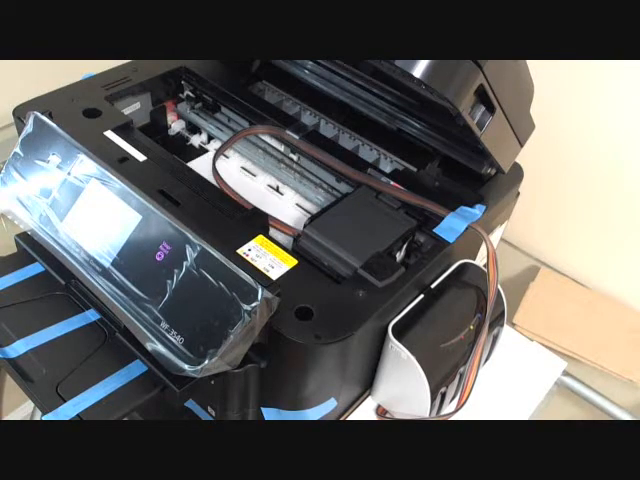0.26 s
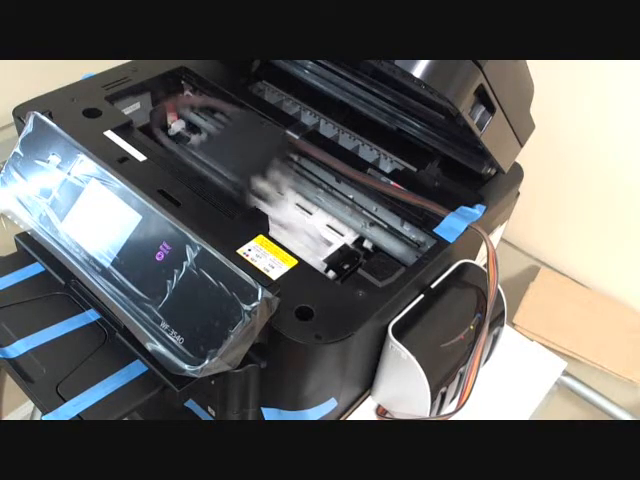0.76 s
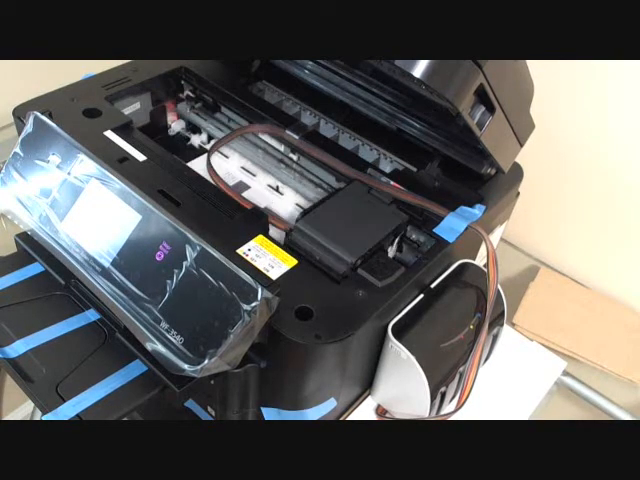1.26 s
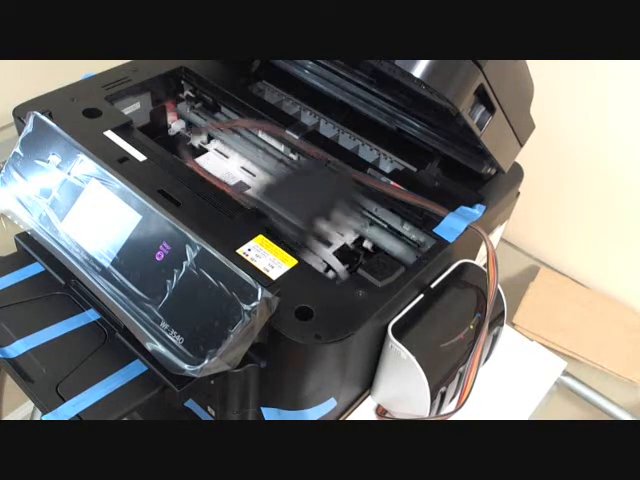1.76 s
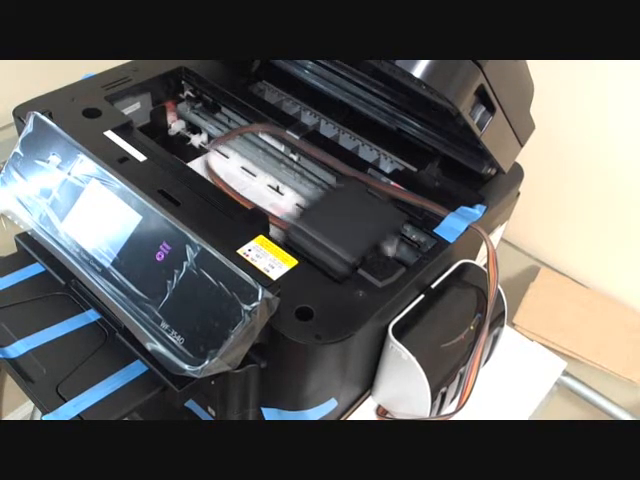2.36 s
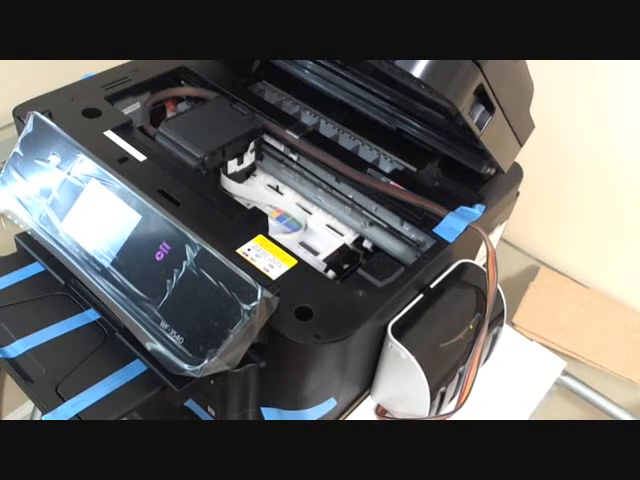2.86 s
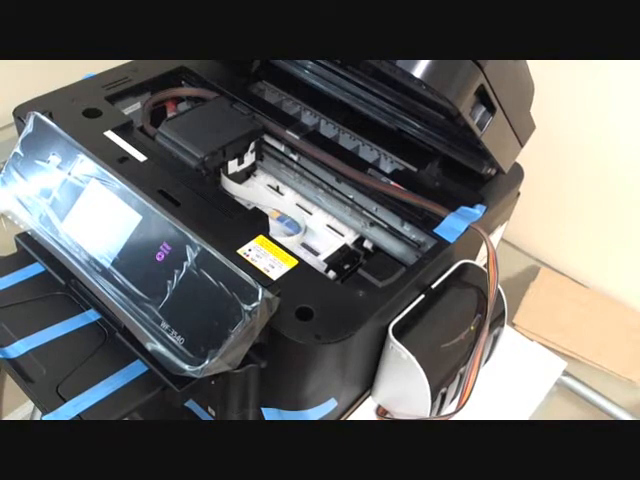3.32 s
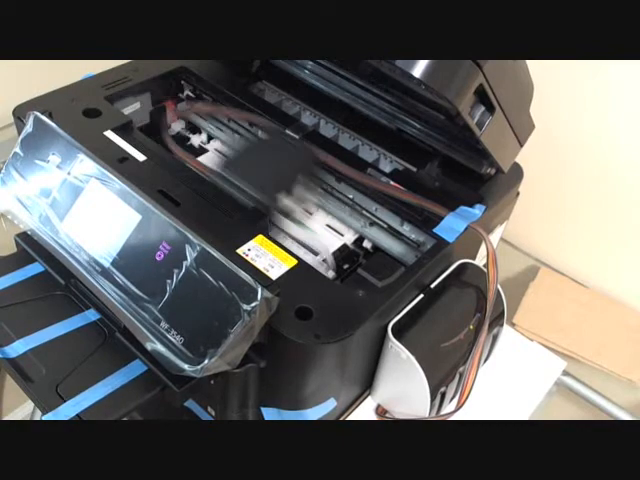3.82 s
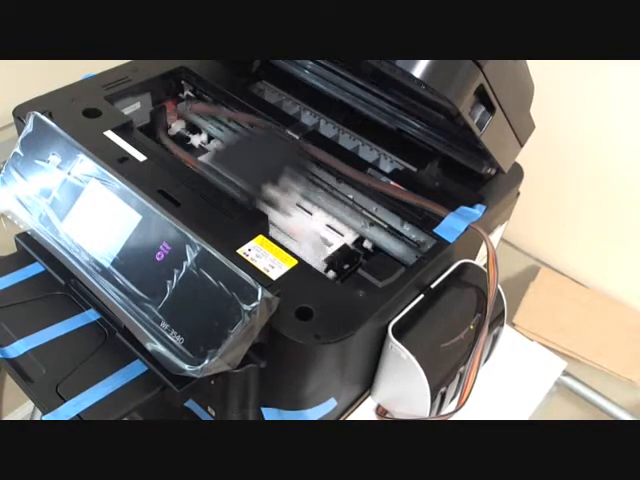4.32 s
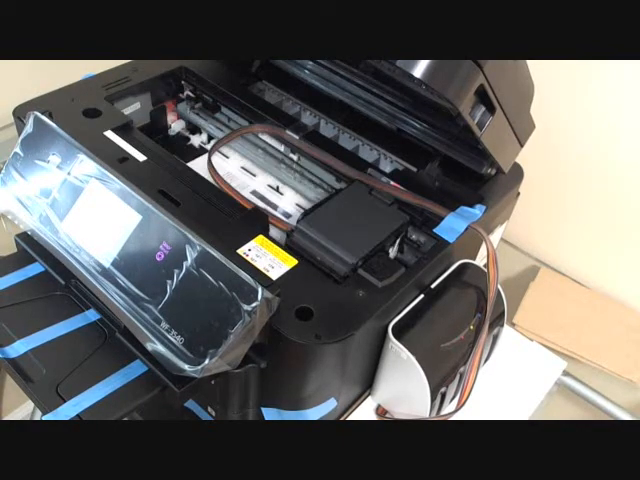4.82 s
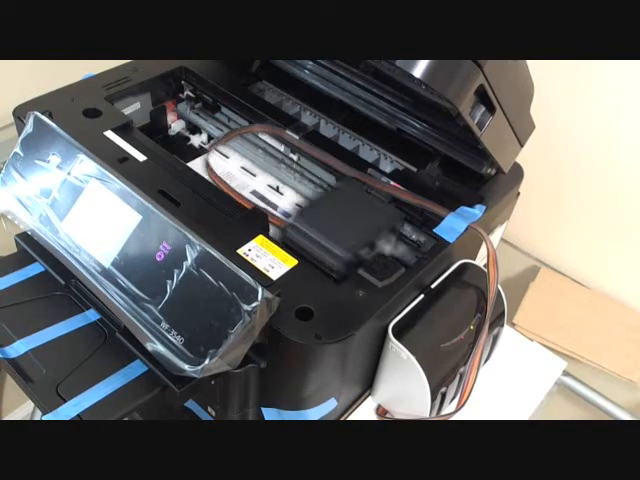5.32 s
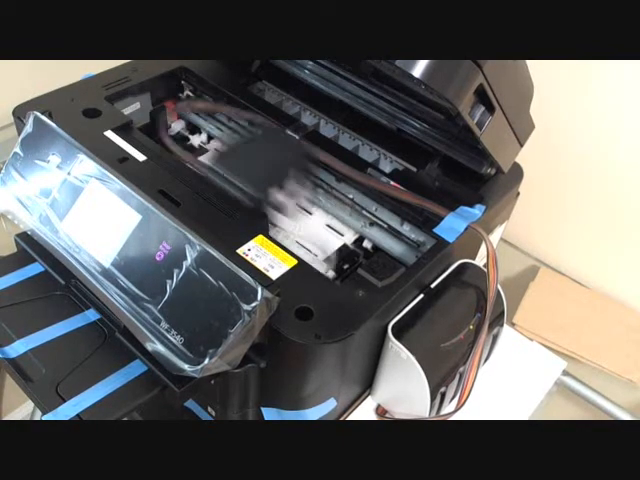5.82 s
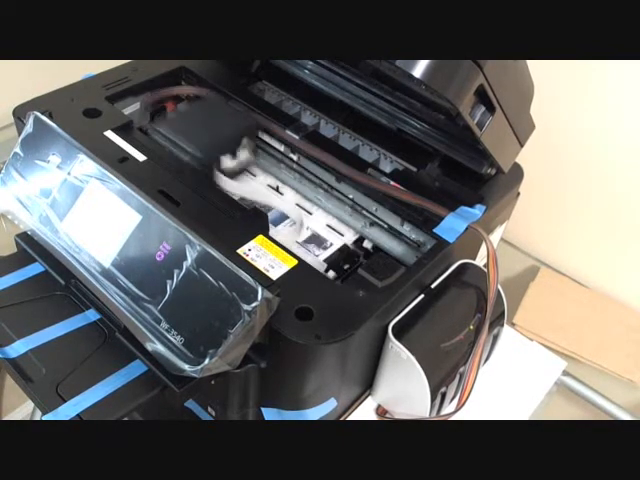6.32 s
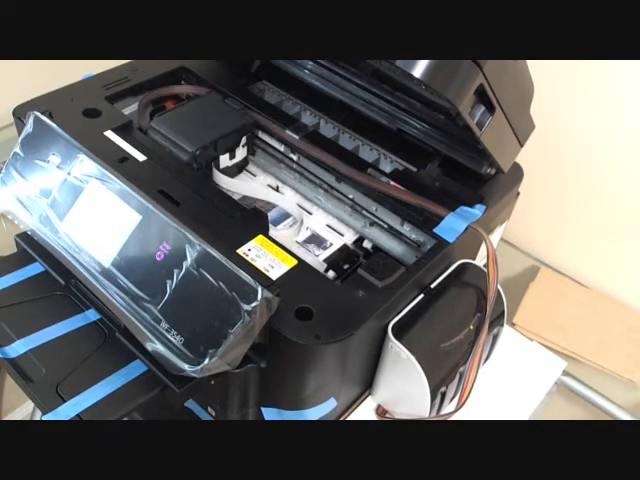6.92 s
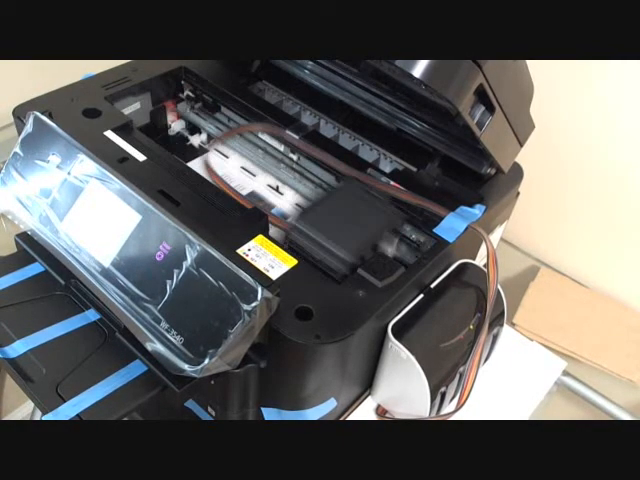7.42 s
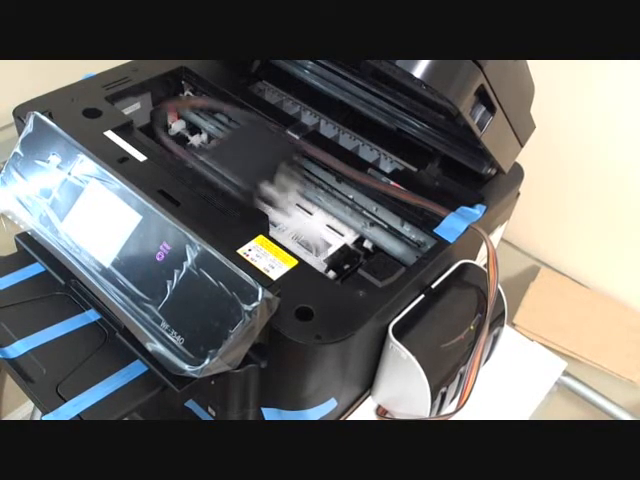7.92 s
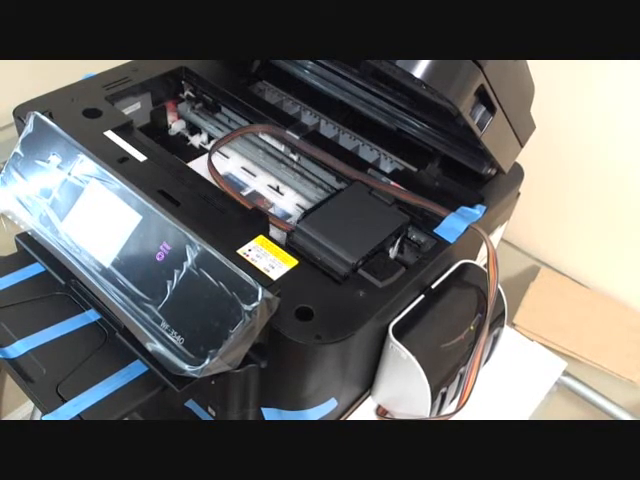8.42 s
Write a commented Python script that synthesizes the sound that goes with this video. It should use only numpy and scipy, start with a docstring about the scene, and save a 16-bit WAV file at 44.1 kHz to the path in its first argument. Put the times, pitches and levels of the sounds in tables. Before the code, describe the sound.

Close to an open inkjet printer in a small quiet room, a hard clack and squeaky gear chatter pull in the sheet. The head makes two faint sweeps, pauses, then shuttles repeatedly with a whining belt drive and sliding rub. Short rattling gear bursts and papery scrapes advance the page between passes, with clacks and soft bumps at the turns. Thin high whistles remain in the pauses.

```python
"""Gears chatter and squeak as an open inkjet printer grabs a sheet, close up in a small room.
The print head then shuttles in short passes: coloured rubbing noise for the rail, sine partials and
fuzzy bands that follow the head speed for the whining belt drive. Between passes grainy noise and case
resonances make the feed gears jerk the paper on. Clacks, jolts and bumps are puffs of coloured noise.
At rest, steady sine whistles of the electronics and a faint hum lie over quiet room air."""
import sys
import numpy as np
from scipy import signal
from scipy.fft import rfft, irfft, next_fast_len
from scipy.io import wavfile
from scipy.ndimage import uniform_filter1d, map_coordinates

SR = 44100
rng = np.random.default_rng(int(sys.argv[2]) if len(sys.argv) > 2 else 0)


def wrap_up_sound(samples):
    """Save the sound to the file named by the first command line argument, as 16-bit audio."""
    columns = np.atleast_2d(samples).T
    # keep every value between -1 and 1, then stretch to whole-number steps
    tamed = np.clip(columns, -1, 1)
    steps = np.round(tamed * 32767).astype(np.int16)
    wavfile.write(sys.argv[1], SR, steps)


N = 382347


def amp(db):
    """Decibels to gain."""
    return 10 ** (np.asarray(db) / 20)


def unit(x):
    """Scale to rms 1."""
    return x / np.sqrt(np.mean(x ** 2) + 1e-20)


def along(points, hz):
    """(Hz, value) points read on a log axis."""
    f, v = np.transpose(points)
    return np.interp(np.log(hz + 1), np.log(f + 1), v)


def clock():
    """The time of every sample, in seconds."""
    return np.arange(N) / SR


def wobble(rate):
    """A smooth random curve, rate knots a second."""
    coarse = np.arange(0, N + 24, 24)
    knots = rng.standard_normal(int(N * rate / SR) + 4)
    curve = map_coordinates(knots, [coarse * rate / SR])
    return np.interp(np.arange(N), coarse, curve)


def narrow(phase, width_hz):
    """A fuzzy line about a running phase."""
    return wobble(2 * width_hz) * np.sin(phase) + wobble(2 * width_hz) * np.cos(phase)


def filtered(x, response):
    """x times a response of frequency."""
    m = next_fast_len(N + SR // 2)
    return irfft(rfft(x, m) * response(np.fft.rfftfreq(m, 1 / SR)), m)[..., :N]


def coloured(x, spectrum):
    """x through a smooth spectrum, at rms 1."""
    return unit(filtered(x, lambda hz: amp(along(spectrum, hz))))


def resonant(x, peaks):
    """x through resonances (f/Hz, width/Hz, level/dB) of alternating sign, at rms 1."""
    def response(hz):
        total = 0
        for k, (centre, width, db) in enumerate(peaks):
            damping = 1j * hz * width
            total = total + (-1) ** k * amp(db) * damping / (centre ** 2 - hz ** 2 + damping)
        return total
    return unit(filtered(x, response))


def grains(rate, spread_db, hiss):
    """Tiny contacts of uneven size at random times, rate a second, over smooth rubbing."""
    sizes = amp(spread_db * np.clip(rng.standard_normal(N), -2, 2))
    hits = (rng.random(N) < rate / SR) * rng.choice([-1, 1], N) * sizes
    return unit(unit(hits) + hiss * rng.standard_normal(N))


def patchy(x, depth_db):
    """x with brief random resonant patches, as a moving part excites ever new spots of the case."""
    z = signal.stft(x, nperseg=512)[2]
    field = uniform_filter1d(rng.standard_normal(z.shape), size=4, axis=0)
    field = uniform_filter1d(field, size=4, axis=1)
    return unit(signal.istft(z * amp(depth_db * unit(field)), nperseg=512)[1][:N])


def bursts(rows, spectrum, t60):
    """A fast-dying puff of coloured noise for each (t/s, level/dB) row."""
    t, envelope = clock(), np.zeros(N)
    for s, db in rows:
        first = int(s * SR)
        age = t[first:][:SR // 3] - s
        attack = np.clip(age * SR / 40, 0, 1)  # over 40 samples
        envelope[first:][:len(age)] += amp(db - 60 * age / t60) * attack
    return envelope * coloured(rng.standard_normal(N), spectrum)


def swell(centre, width):
    """A bell-shaped rise and fall about a moment."""
    return np.exp(-.5 * np.minimum(((clock() - centre) / width) ** 2, 100))


def stroke(start, rise_db_per_s, hold, fall_db_per_s):
    """Envelope that rises to 1 at start, holds, then dies away."""
    age = clock() - start
    rise = rise_db_per_s * np.maximum(-age, 0)
    fall = fall_db_per_s * np.maximum(age - hold, 0)
    return amp(-np.minimum(rise + fall, 200))


def gate(start, length, edge=.02):
    """1 for a stretch of time, with soft edges."""
    age = clock() - start
    return np.clip(np.minimum(age, length - age) / edge + .5, 0, 1)


# whistles of the driver electronics: (f/Hz, level/dB at rest, level/dB while the motor holds the head)
WHISTLES = [(4100, -92.5, -95), (4600, -86, -95), (5220, -84.5, -85), (5600, -90.5, -90),
            (6336, -93.5, -90), (6860, -90, -81.5), (8000, -88.5, -86), (8670, -92, -103),
            (9240, -90.5, -81), (9740, -84.5, -74), (10363, -83, -83), (11000, -86, -81.5),
            (11600, -88.5, -90), (12091, -96, -100)]
# faint hum of the idle printer: (f/Hz, level/dB)
IDLE_HUM = [(269, -83), (732, -88), (1249, -92), (1389, -86.5), (1470, -89.5)]
# colour of the room air: (f/Hz, level/dB)
AIR_COLOUR = [(15, -77), (25, -46), (66, -4.5), (207, -3), (271, -2.5), (335, -12), (709, -14.5),
              (1310, -17.5), (1420, -16.5), (3830, -29.5), (4500, -24.5), (6040, -28), (10600, -29),
              (15000, -41)]
HOLD_S, HOLD_LENGTH_S = 2.78, 0.8  # the motor holds the head at the far end


def idle(air_db=-68.5):
    """Thin steady whistles of the motor drivers and a faint hum, over the quiet air of the room."""
    t, held = clock(), gate(HOLD_S, HOLD_LENGTH_S)

    def tone(hz, db):
        level = np.sqrt(2) * amp(db + 1.5 * wobble(3))
        return level * np.sin(2 * np.pi * hz * t + .1 * wobble(150))

    whistle = sum(tone(hz, rest + (holding - rest) * held) for hz, rest, holding in WHISTLES)
    hum = sum(tone(hz, db) for hz, db in IDLE_HUM)
    shared_noise = rng.standard_normal(N)
    air = coloured(shared_noise + 0.37 * rng.standard_normal((2, N)), AIR_COLOUR)
    return whistle + hum + amp(air_db) * air


# soft nudges of the idle motor: (t/s, level/dB)
NUDGES = [(1.019, -53), (2.839, -47.5), (3.076, -49), (3.309, -48.5), (4.799, -55), (6.389, -73),
          (8.326, -45), (8.56, -42.5)]
# frame modes that a nudge rings: (f/Hz, level/dB, t60/s)
NUDGE_MODES = [(252, -14, 0.13), (425, -8.5, 0.088), (528, 3.5, 0.066), (586, 2, 0.051), (1230, -13, 0.024)]


def nudges(attack=.012):
    """Each small twitch of the motor rings the frame softly, with slightly varied modes."""
    out, t = np.zeros(N + SR), np.arange(SR // 4) / SR
    for s, db in NUDGES:
        ring = 0
        for hz, level, t60 in NUDGE_MODES:
            decay = amp(level + rng.normal(0, 1) - 60 * t / t60)
            ring = ring + decay * np.sin(2 * np.pi * hz * rng.normal(1, 0.023) * t)
        out[int(s * SR):][:len(t)] += amp(db + 3.5) * ring * (1 - np.exp(-t / attack))
    return out[:N]


# sharp plastic clacks of head and gears: (t/s, level/dB, low knock level/dB relative to the clack)
CLACKS = [(0.0387, -10.5, 2.5), (0.5207, -31, -6), (0.83, -33.5, -4), (1.9453, -17.5, -15),
          (2.035, -10, 6.5), (2.2518, -23, -6), (2.686, -17.5, -18), (3.828, -16, -9), (4.341, -18, -23),
          (5.493, -22, -3.5), (5.837, -27, -17), (6.2741, -19.5, -19), (7.3452, -23, 1.5),
          (7.39, -17.5, 7.5), (7.6511, -21, -0.5), (7.824, -32.5, 8.5)]
# colour of a clack: (f/Hz, level/dB)
CLACK_COLOUR = [(180, -37), (300, -11.5), (587, -19), (1150, -3.5), (1620, -9), (5530, -11), (10600, -13.5),
                (13600, -40.5), (15000, -82)]
# the belt takes up its slack as the head starts, turns or stops: (t/s, level/dB)
JOLTS = [(0.989, -44.5), (1.658, -47), (1.681, -45), (2.719, -45), (3.499, -35.5), (4.447, -41),
         (4.497, -43), (4.759, -40), (5.161, -41), (5.969, -30.5), (6.351, -42), (6.999, -37.5),
         (8.102, -33)]
# colour of a jolt, also of the knock under a clack: (f/Hz, level/dB)
JOLT_COLOUR = [(70, -29), (150, -5), (260, 3.5), (450, -4), (780, 6.5), (1250, -5.5), (1650, -23.5),
               (2400, -25), (3200, -33.5), (6000, -49), (12000, -75)]
# the returning head bumps on its rail: (t/s, level/dB)
BUMPS = [(0.7816, -43), (3.6498, -31), (4.571, -35), (4.7014, -36.5), (5.7894, -31), (7.1661, -29),
         (7.9344, -36.5)]
# colour of a bump: (f/Hz, level/dB)
BUMP_COLOUR = [(150, -23), (700, -18.5), (1000, -12), (1130, 11), (1300, -13), (1700, -23.5), (3300, -30),
               (6000, -27.5), (12000, -60)]
# the head rattles briefly as it comes to a stop: (t/s, level/dB)
STOPS = [(2.715, -47.5), (8.118, -42)]
# colour of the stopping rattle: (f/Hz, level/dB)
STOP_COLOUR = [(88, -35), (150, -3), (287, 9), (682, -20), (935, -30), (1090, 3), (1540, -12), (2220, 3.5),
               (3910, -22), (5370, -25), (8000, -69), (10400, -80), (17600, -120)]
# colour of the gear snap: (f/Hz, level/dB)
SNAP_COLOUR = [(900, -34.5), (1700, -12.5), (2100, 2), (2450, -1), (3000, -23.5), (6000, -35.5)]
SNAP_S, SNAP_DB, SNAP_T60_S = 2.034, -16.5, 0.072  # one hard snap of the feed gears rings the case


def knocks():
    """Bright clacks with a dull knock beneath, jolts of the belt, bumps on the rail and rattling stops."""
    clacks = bursts([(s, db) for s, db, low in CLACKS], CLACK_COLOUR, t60=0.035)
    thuds = bursts([(s, db + low) for s, db, low in CLACKS], JOLT_COLOUR, t60=0.077)
    jolts = bursts(JOLTS, JOLT_COLOUR, t60=0.14)
    bumps = bursts(BUMPS, BUMP_COLOUR, t60=0.091)
    snap = bursts([(SNAP_S, SNAP_DB)], SNAP_COLOUR, t60=SNAP_T60_S)
    rattle = coloured(grains(rate=460, spread_db=4, hiss=0.91), STOP_COLOUR)
    stops = sum(amp(db) * swell(s, 0.013) for s, db in STOPS) * rattle
    strikes = amp(-10) * clacks + amp(-17) * thuds
    return snap + strikes + amp(-9.5) * jolts + amp(-2.0) * bumps + stops


# tugs of the pick roller: (t/s, rise/dB per s, hold/s, gear clatter level/dB, paper scrape level/dB,
# squeak f/Hz at the start, squeak f/Hz at the end)
TUGS = [(.005, 2002, 0.015, -46.5, -49.5, 900, 850), (0.038, 2197.5, 0.01, -24, -27.5, 1230, 1180),
        (0.137, 699.5, 0.021, -29, -32.5, 1230, 1460), (0.182, 998, .028, -30, -37, 1193, 1114),
        (0.226, 1001, 0.024, -26.5, -34.5, 1464, 1063)]
# colour of the pick gears: (f/Hz, level/dB)
PICK_BODY = [(150, -28.5), (280, 2), (430, -1.5), (520, -6.5), (780, -1.5), (900, -4), (1160, 2.5),
             (1450, -1), (1900, -7.5), (2700, -14.5), (3600, -18), (6000, -40)]
# colour of the dragged sheet: (f/Hz, level/dB)
PICK_SCRAPE = [(1470, -18), (2500, 2), (3780, -21), (4130, -4), (5060, -3), (7360, -16), (9280, -2),
               (12300, -13.5), (15000, -29)]
# low resonances of the frame: (f/Hz, width/Hz, level/dB)
FRAME = [(146.3, 28, -7), (221.3, 74, 0.5)]
# the pick gears thump the frame: (t/s, level/dB)
THUMPS = [(.05, -31.5), (.205, -35.5), (.25, -28)]
THUMP_WIDTH_S = .007
PICK_FALL_DB_PER_S, PICK_SCRAPE_FALL_DB_PER_S = 409, 565.5  # shared by all tugs
# the frame drones while the pick gears turn
DRONE_S, DRONE_LENGTH_S, DRONE_DB = .04, .258, -38
DRONE_RISE_DB_PER_S, DRONE_FALL_DB_PER_S = 2000, 600


def pick_up(clatter_db=-3, squeak_db=-6, scrape_db=-3.5, squeak_width_hz=110):
    """In a few tugs the pick roller's gears chatter and squeak, shake the frame and drag the sheet in."""
    t = clock()
    clatter, scrape, squeak = np.zeros((3, N))
    for s, rise, hold, gear_db, paper_db, from_hz, to_hz in TUGS:
        tug = amp(gear_db) * stroke(s, rise, hold, PICK_FALL_DB_PER_S)
        clatter += tug
        scrape += amp(paper_db) * stroke(s, rise, hold, PICK_SCRAPE_FALL_DB_PER_S)
        squeak_hz = np.interp(t, [s, s + hold], [from_hz, to_hz])
        squeak += tug * narrow(2 * np.pi * np.cumsum(squeak_hz) / SR, squeak_width_hz)
    drone = amp(DRONE_DB) * stroke(DRONE_S, DRONE_RISE_DB_PER_S, DRONE_LENGTH_S, DRONE_FALL_DB_PER_S)
    drone = drone + sum(amp(db) * swell(s, THUMP_WIDTH_S) for s, db in THUMPS)
    frame = sum(amp(db + 2.5 * wobble(60)) * np.sin(2 * np.pi * hz * t + wobble(width))
                for hz, width, db in FRAME)
    teeth = patchy(grains(rate=2400, spread_db=2, hiss=.6), depth_db=3)
    gears = amp(clatter_db) * clatter * coloured(teeth, PICK_BODY) + amp(squeak_db) * squeak
    return gears + drone * frame + amp(scrape_db) * scrape * coloured(teeth, PICK_SCRAPE)


# paper advances, all with the same motion: (t/s at full speed, gear clatter level/dB, paper level/dB)
FEEDS = [(2.012, -20.5, -23.5), (3.832, -21.5, -27), (5.501, -22, -25.5), (7.351, -20.5, -26)]
# colour of the feed gears: (f/Hz, level/dB)
GEAR_BODY = [(50, -28), (100, -22), (150, -9.5), (220, -3.5), (330, -3.5), (450, -4.5), (780, 1.5),
             (1000, -1.5), (1300, -0.5), (1700, -5), (2400, -7.5), (2900, -17), (3400, -35), (6000, -68)]
# ringing modes of the plastic case: (f/Hz, level/dB)
CASE_MODES = [(218, -7), (434, 5.5), (538, -2), (577, -2.5), (631, 2.5), (675, -2.5), (787, 7.5), (890, -4),
              (1025, -7), (1141, 2), (1185, -8.5), (1269, 6.5), (1362, -4.5), (1438, 1), (1732, -1.5),
              (1929, -15), (2341, -5), (2710, -6.5)]
# colour of the paper's scrape: (f/Hz, level/dB)
SCRAPE_COLOUR = [(1500, -47.5), (2700, -0.5), (3100, -3.5), (3800, -1), (5000, 5), (6000, -2.5), (6800, -2),
                 (7600, -31.5), (10000, -53)]
# colour of the paper's hiss: (f/Hz, level/dB)
HISS_COLOUR = [(5000, -35), (7200, -5.5), (9000, 1), (10600, -4.5), (12000, -11), (13200, -21),
               (15000, -33.5)]
FEED_RISE_DB_PER_S, FEED_HOLD_S, FEED_BRAKE_DB_PER_S = 560.5, .042, 452  # the roller jerks and brakes
CREEP_DB, CREEP_FALL_DB_PER_S, CREEP_S = 1, 115.5, .255  # then creeps ever slower to its mark and stops
SCRAPE_POWER, HISS_POWER = 1.39, 1.8  # paper noise grows with these powers of the roller speed


def roller_speed(start):
    """Relative feed roller speed: a quick jerk, then a slowing creep until it stops."""
    jerk = stroke(start, FEED_RISE_DB_PER_S, FEED_HOLD_S, FEED_BRAKE_DB_PER_S)
    creep = amp(CREEP_DB) * stroke(start, FEED_RISE_DB_PER_S, 0, CREEP_FALL_DB_PER_S)
    stop = stroke(start, 0, CREEP_S, FEED_BRAKE_DB_PER_S)
    return np.maximum(jerk, creep * stop)


def feed(mode_width_hz=14, scrape_db=-4, hiss_db=-11):
    """Gear teeth rattle the case as the roller turns; as it slows the paper's hiss dies first, clatter last."""
    clatter, scrape, hiss = np.zeros((3, N))
    for s, gear_db, paper_db in FEEDS:
        speed = roller_speed(s)
        clatter += amp(gear_db) * speed
        scrape += amp(paper_db) * speed ** SCRAPE_POWER
        hiss += amp(paper_db) * speed ** HISS_POWER
    teeth = patchy(grains(rate=2600, spread_db=3.5, hiss=.7), depth_db=2)
    modes = [(hz, mode_width_hz, db) for hz, db in CASE_MODES]
    case = resonant(grains(rate=1400, spread_db=1.5, hiss=.6), modes)
    case = coloured(case, [(100, -19.0), (200, 5), (2800, 0), (4000, -30.5)])
    gears = clatter * (amp(-3.0) * coloured(teeth, GEAR_BODY) + amp(-8.0) * case)
    paper = amp(scrape_db) * scrape * coloured(teeth, SCRAPE_COLOUR)
    return gears + paper + amp(hiss_db) * hiss * coloured(teeth, HISS_COLOUR)


# head passes: (start t/s, braking t/s, direction +1 out / -1 back, sliding level/dB, whine level/dB,
# starting rattle level/dB, braking rattle level/dB)
PASSES = [(0.226, 0.552, 1, -54.5, -57, -47, -61), (0.61, 0.913, -1, -54.5, -62, -61, -57),
          (1.662, 1.983, 1, -41, -40.5, -51.5, -45), (2.036, 2.339, -1, -42, -43.5, -49, -45),
          (2.405, 2.698, 1, -45, -42, -50.5, -54), (3.501, 3.775, -1, -40.5, -44.5, -45.5, -45),
          (4.059, 4.359, 1, -43, -43, -63, -44.5), (4.42, 4.704, -1, -44.5, -47.5, -62, -53.5),
          (5.162, 5.455, 1, -40.5, -42, -53.5, -45), (5.627, 5.929, -1, -42, -45.5, -47.5, -44.5),
          (5.991, 6.296, 1, -46.5, -44.5, -48.5, -49), (7.002, 7.304, -1, -40.5, -44.5, -48, -50.5),
          (7.37, 7.686, 1, -41, -41.5, -44, -45), (7.76, 8.065, -1, -45, -43.5, -52, -59.5)]
MESH_HZ = 1080.7  # belt teeth meeting the pulley at full speed


def travel(start, brake, run_up=.093, run_down=.125, knee=9):
    """Head speed 0-1: an even push that eases into cruising, then even braking."""
    t = clock()
    push = np.clip((t - start) / run_up, 0, 4)
    cruise = push / (1 + push ** knee) ** (1 / knee)
    return cruise * np.clip(1 - (t - brake) / run_down, 0, 1)


# rough orders of the straining motor: (multiple of the tooth rate, level/dB)
GROWL = [(.45, -4.5), (.8, -5), (1.05, 3.5), (1.4, -4)]
# colour of the rattling head: (f/Hz, level/dB)
CHATTER_COLOUR = [(80, -34.5), (150, -10), (260, -0.5), (430, -10), (620, 0.5), (850, 1.5), (1100, 2.5),
                  (1600, -12), (2600, -18.5), (6000, -34.5), (12000, -58)]
# the frame hums as the head pushes off from the near end: (t/s, level/dB)
HUMS = [(1.73, -58), (2.47, -57), (4.12, -45), (5.23, -45.5), (6.05, -48.5)]


def reversals(far_db=-4, growl_db=-6, chatter_db=-4.0, growl_width_hz=55, strain_s=0.033, rock_s=0.047):
    """Pushing off and braking make the motor growl at a gliding pitch, rattle the head and rock the frame."""
    t = clock()
    speed, strain, far = np.zeros((3, N))
    for start, brake, direction, _, _, start_db, brake_db in PASSES:
        speed = np.maximum(speed, travel(start, brake))
        under_way = np.clip((t - start) / .015, 0, 1)
        strain += under_way * amp(start_db) * swell(start + 0.067, strain_s)
        strain += amp(brake_db) * swell(brake + 0.029, strain_s)
        # the frame rocks at the far end: braking on the way out, pushing off on the way back
        if direction > 0:
            far += amp(brake_db) * swell(brake + 0.025, .05)
        else:
            far += under_way * amp(start_db + 4) * swell(start + 0.026, rock_s)
    phase = 2 * np.pi * np.cumsum(MESH_HZ * np.maximum(speed, .3)) / SR
    growl = sum(amp(db) * narrow(k * phase, growl_width_hz) for k, db in GROWL)
    chatter = coloured(grains(rate=400, spread_db=3.0, hiss=0.55), CHATTER_COLOUR) * amp(2 * wobble(50))
    hum = np.sin(2 * np.pi * FRAME[0][0] * t + .6 * wobble(40))
    hum = hum * sum(amp(db) * swell(s, .03) for s, db in HUMS)
    rumble = resonant(grains(rate=250, spread_db=4.5, hiss=.5), FRAME[1:])
    rumble = coloured(rumble, [(1500, 0), (4000, -5), (9000, -25)])
    return strain * (amp(growl_db) * growl + amp(chatter_db) * chatter) + hum + amp(far_db) * far * rumble


# partials of the drive: (multiple of the tooth rate, level/dB going out, level/dB coming back)
WHINE = [(1, 1.5, -1), (1.998, -21, -10), (2.12, -23, -21), (3, -4, -12), (3.08, -15.5, -11),
         (4, -21.5, -14.5), (4.38, -15.5, -19.5), (5, -9, -9)]
# motor ripple, fuzzy bands that glide with the speed:
# (multiple of the tooth rate, level/dB going out, level/dB coming back)
RIPPLE = [(.74, -14, -14.5), (.96, -16, -10), (1.08, -21.5, -1.5), (1.19, -11.5, -9.5), (1.32, -11.5, -20),
          (2.08, -16.5, -9.5), (3.06, -12.5, -15.5), (4.998, -11, -4.5)]
# colour of the head sliding on its rail: (f/Hz, level/dB)
SLIDE_COLOUR = [(60, -49), (130, -23.5), (235, -4.5), (450, -19.5), (800, -5), (1150, -3.5), (1400, -4.5),
                (1750, -10), (2250, -7), (2800, -9.5), (3400, -4.5), (5300, -5.5), (7300, -15),
                (10500, -15), (12500, -25.5), (15000, -52.5)]


def carriage(flutter=.002, back_flutter=.0012, ripple_hz=50, slide_db=-2, squeal_db=-50.5):
    """The head slides on its rail; belt and motor sing at pitches that follow its speed."""
    t = clock()
    speed, slide, whine, drive, back = np.zeros((5, N))
    for start, brake, direction, rail_db, whine_db, *_ in PASSES:
        v = travel(start, brake)
        back[v > speed] = direction < 0
        speed = np.maximum(speed, v)
        slide += amp(rail_db) * v ** 2
        whine += amp(whine_db) * v ** 2
        # overtones need a fast belt under pull
        drive += np.clip((v - .84) / 0.095, 0, 1) * np.clip(1 - (t - brake) / .014, 0, 1)
    hunting = 1 + (flutter + back_flutter * back) * wobble(45)  # the servo hunts about its set speed
    phase = 2 * np.pi * np.cumsum(MESH_HZ * speed * hunting) / SR

    def shimmer():
        return amp(1.8 * wobble(35) + 2 * wobble(170))

    def strength(k, out_db, home_db):
        return (drive if k >= 2 else 1) * amp(out_db + (home_db - out_db) * back)

    tones = sum(strength(*row) * shimmer() * np.sin(row[0] * phase) for row in WHINE)
    fuzz = sum(strength(*row) * narrow(row[0] * phase, ripple_hz) for row in RIPPLE)
    song = whine * (speed ** 4 * tones + amp(-3.0) * fuzz)
    # the tenth partial is as loud on every pass
    squeal = np.sin(10 * phase) + 0.24 * narrow(10 * phase, 150)
    squeal = drive * amp(squeal_db) * shimmer() * squeal
    contacts = patchy(grains(rate=3000, spread_db=3, hiss=1), depth_db=3)
    rail = coloured(contacts, SLIDE_COLOUR)
    dull = filtered(rail, lambda hz: 1 / (1 + (hz / 4500) ** 4))
    rail = dull + (rail - dull) * speed ** 2  # slow sliding is duller
    return song + squeal + slide * rail * amp(slide_db + 1.4 * wobble(30))


# decay of the room: (f/Hz, t60/s)
ROOM_DECAY = [(150, 0.48), (1000, 0.11), (5000, 0.2), (12000, 0.13)]


def room(x):
    """The walls' answer, each frequency dying at its own speed."""
    hz, t, z = signal.stft(rng.standard_normal(SR // 2), SR, nperseg=256)
    decay = amp(-60 * t / along(ROOM_DECAY, hz)[:, None])
    tail = signal.istft(z * decay, SR, nperseg=256)[1]
    delayed = np.pad(tail, (200, 0))  # samples
    return signal.fftconvolve(x, delayed / np.linalg.norm(tail))[:N]


# the left side is louder in the bass: (f/Hz, left minus right level/dB)
LEAN = [(30, 0), (80, 7), (170, 6.3), (350, 2.4), (700, 2.6), (1300, 1.4), (2500, -.4), (5000, 0),
        (11000, .3)]
# spread of the room sound: (f/Hz, relative side level/dB)
WIDTH = [(60, -5.5), (150, -19.5), (400, -21.5), (1000, -21.5), (3000, -30.5), (6000, -26.5), (9000, -17.5),
         (13000, -20.5)]


def scene():
    """The printer is almost mono; its low notes lean left and spread in the room."""
    printer = nudges() + knocks() + pick_up() + reversals() + feed() + carriage()
    mid = printer + amp(-11.5) * room(printer)
    side = filtered(room(printer), lambda hz: amp(along(WIDTH, hz) - 2.0))
    pair = np.array([mid + side, mid - side])
    pair = filtered(pair, lambda hz: amp(np.outer([.5, -.5], along(LEAN, hz))))
    return pair + idle()


TOP_HZ = 15000  # band limit


def record(dry, bass_hz=95):
    """The small microphone loses the deep bass; nothing is kept above the band limit."""
    return filtered(dry, lambda hz: (hz < TOP_HZ) * hz ** 2 / (hz ** 2 + bass_hz ** 2))


dry = scene()
out = record(dry)
wrap_up_sound(out)
```